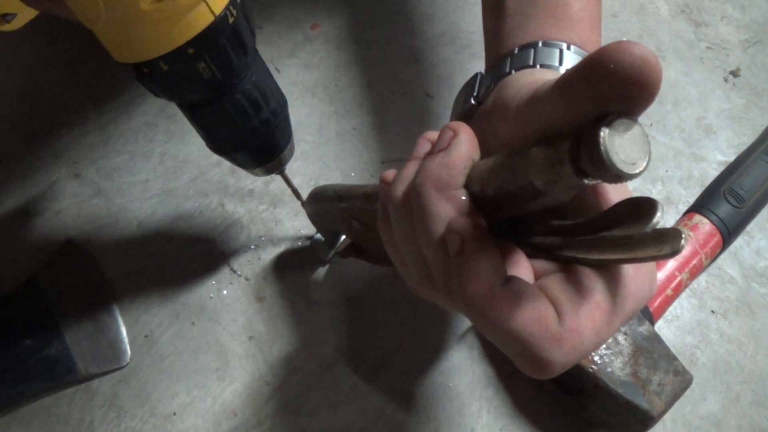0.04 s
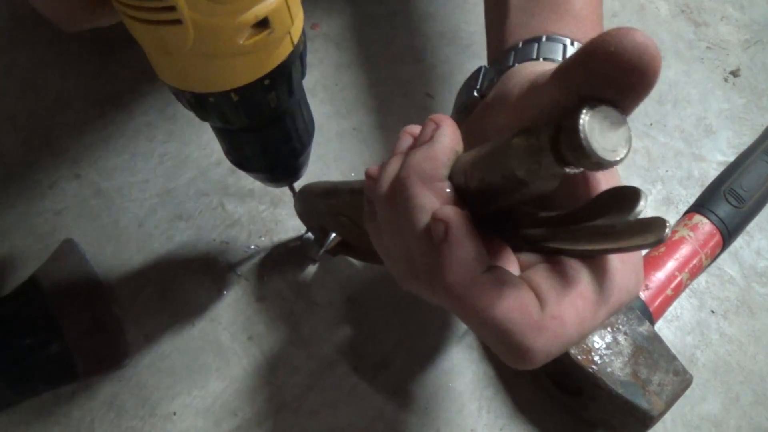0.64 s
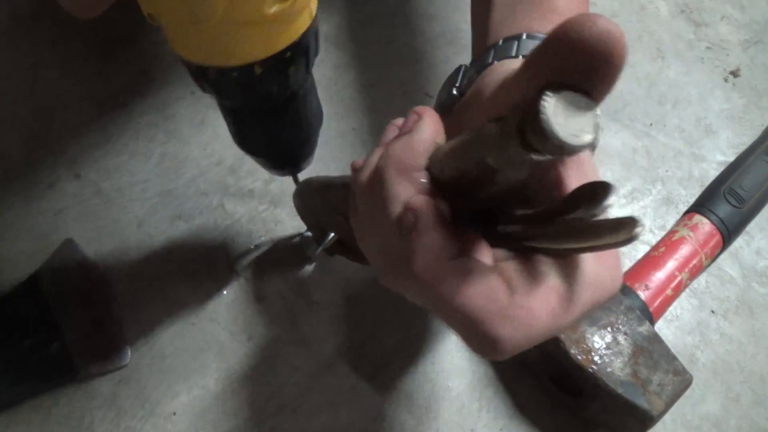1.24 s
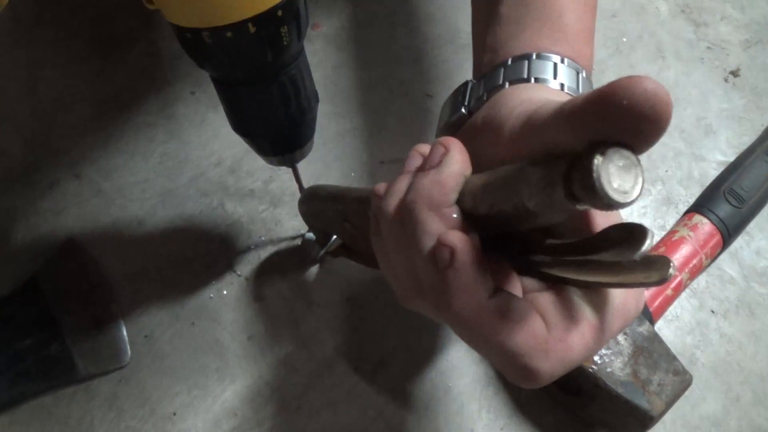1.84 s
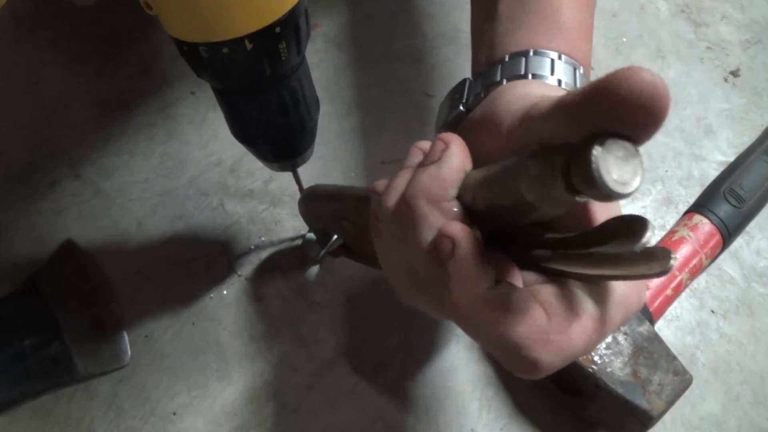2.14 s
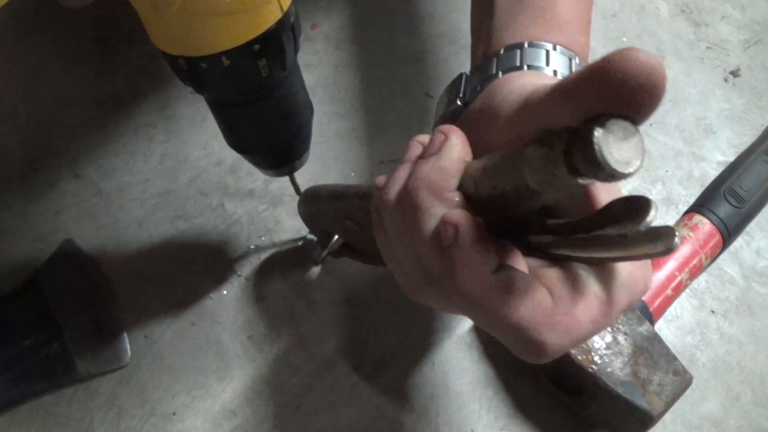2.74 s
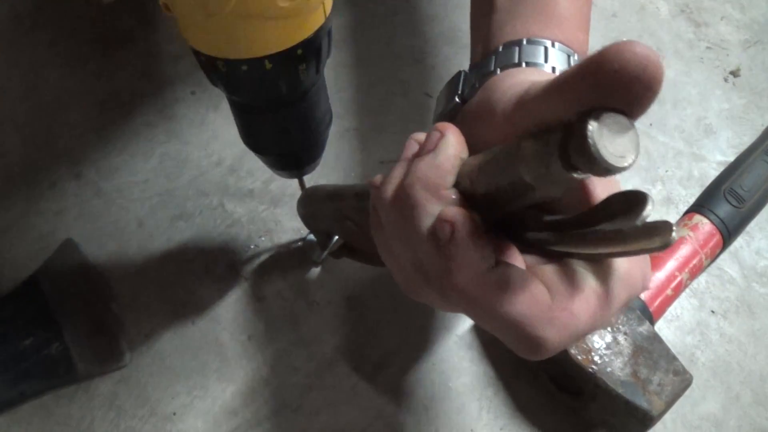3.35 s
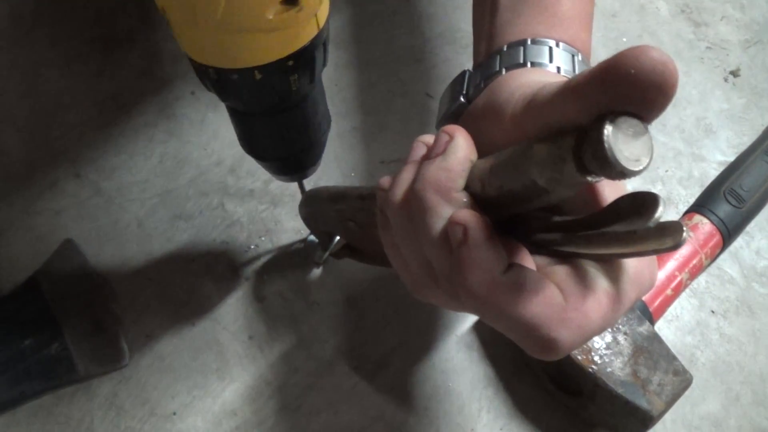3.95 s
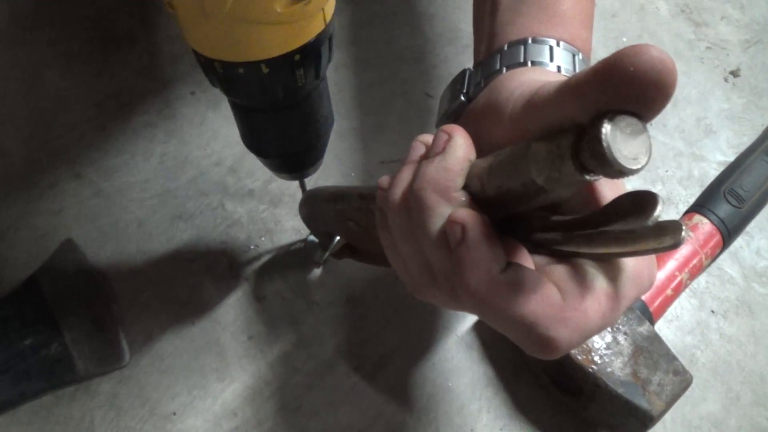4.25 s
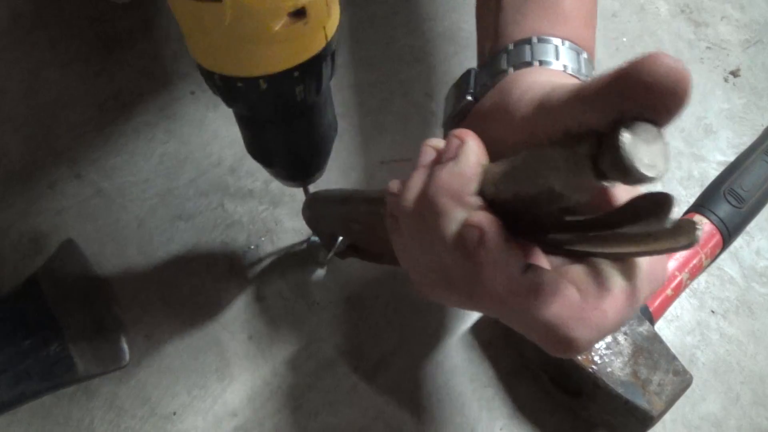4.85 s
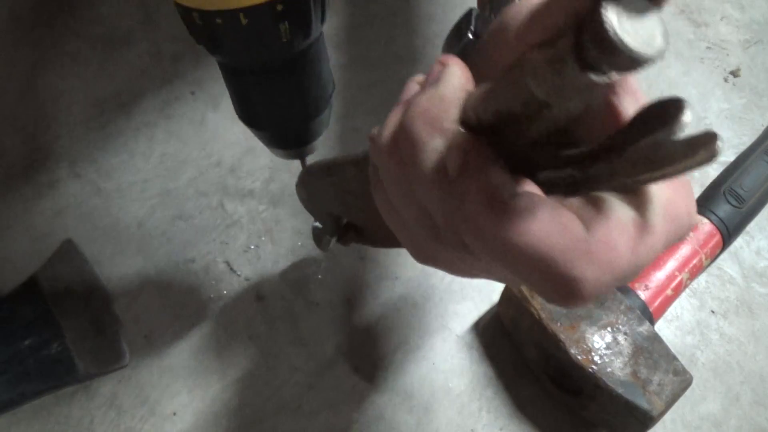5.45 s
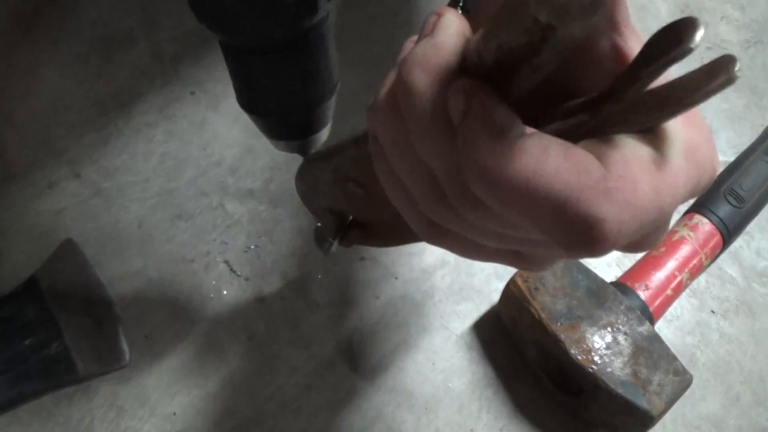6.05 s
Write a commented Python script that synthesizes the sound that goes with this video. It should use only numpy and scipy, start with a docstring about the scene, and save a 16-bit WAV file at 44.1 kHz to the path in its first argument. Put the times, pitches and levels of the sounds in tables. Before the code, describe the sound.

Close up in a quietly humming workshop, a cordless drill gives two quick, clacking blips. Its bit ticks and rubs faintly on steel, then catches with a shrill, ringing crack as the motor starts again. A run of eight more short bursts follows, each a rising motor whine with gear rattle and harsh, hissing metal grinding, some with a brief groan from the bit. The room adds a little reverberation.

```python
"""Cordless drill on steel

A drill is blipped eleven times against a small steel part held in locking pliers on a concrete floor.
Each pull takes up the gear slack, spins the motor up and brakes it: gears whine and rattle in the
housing while the bit grinds. The bit clicks, groans, squeaks and snags, and the steel rings.
The workshop hums and reverberates; a limiter flattens the loud bursts."""
import sys
import numpy as np
from scipy import signal
from scipy.fft import rfft, irfft, next_fast_len
from scipy.io import wavfile
from scipy.ndimage import uniform_filter1d

SR = 44100
rng = np.random.default_rng(int(sys.argv[2]) if len(sys.argv) > 2 else 0)


def to_wav(sig):
    """Store sig (one row per channel, or 1-D mono) as 16-bit WAV at the path in sys.argv[1].

    Samples outside -1..1 are clipped; the rate is SR.
    """
    pcm = np.clip(np.atleast_2d(sig), -1, 1) * 32767
    pcm = np.round(pcm).astype(np.int16)
    wavfile.write(sys.argv[1], SR, pcm.T)  # frames by channels


N = 268304
TIME = np.arange(N) / SR

# trigger pulls: (power on [s], at rest [s], target speed [Hz], spin-up time constant [s],
# slack clack [dB], grinding [dB], screech [dB])
PULLS = [(.897, 1.02, 419.7, .013, -30, -13, -15), (1.214, 1.319, 398.7, .008, -10.5, -15, -17),
         (2.223, 2.387, 381, 0.024, -21, -22, -11.5), (2.663, 2.833, 402.7, 0.038, -18, -1, -2),
         (3.266, 3.444, 414, 0.033, -14.5, -1, -1.5), (3.589, 3.779, 401.5, .048, -18.5, 1, 1.5),
         (3.905, 4.131, 491, 0.068, -29, 2, 1), (4.253, 4.477, 424.5, .063, -30, 0.5, -3.5),
         (4.707, 4.928, 416.6, 0.059, -28.5, 1.5, -11), (5.428, 5.616, 339.7, 0.043, -22, 2, 4),
         (5.866, 6.089, 339.5, 0.043, -27.5, -0.5, 2.5)]
# housing response: (frequency [Hz], level [dB])
HOUSING = [(100, -50), (300, -9), (600, -13), (950, -4), (1200, -2.5), (1700, -5), (2600, -5), (3200, -15),
           (4000, -4), (5000, -2), (6400, -11.5), (9000, -9), (13000, -22), (16000, -33)]
# housing modes: (frequency [Hz], width [Hz], level [dB])
HOUSING_MODES = [(1180, 610, -4), (1604, 89, -6), (2213, 164, -4), (2616, 114, -2.5), (3990, 183, 7),
                 (4920, 320, 9.5)]
# bit-on-steel friction spectrum: (frequency [Hz], level [dB])
GRIND = [(300, -32.5), (1000, -26), (2200, -17), (3300, -12.5), (4100, -15), (4650, 0.5), (5500, -3.5),
         (6500, -8.5), (7200, -4), (7700, 0.5), (8400, -4.5), (9400, -0.5), (11500, -7.5), (16000, -26.5)]


def gain_of(db):
    """Decibels to amplitude."""
    return 10 ** (np.asarray(db) / 20)


def unit_rms(x):
    """Scales to rms 1."""
    return x / np.sqrt(np.mean(x ** 2) + 1e-20)


def log_interp(points, hz):
    """Interpolates (frequency [Hz], value) points on a log-frequency axis."""
    points_hz, values = np.transpose(points)
    return np.interp(np.log(hz + 1), np.log(points_hz + 1), values)


def add(mix, at_s, sound):
    """Mixes a sound in at a time."""
    part = mix[round(at_s * SR):][:len(sound)]
    part += sound[:len(part)]


def wander(count, cutoff_hz):
    """Low-passed noise of rms 1."""
    size = next_fast_len(count, True)
    rolloff = 1 + (np.fft.rfftfreq(size, 1 / SR) / cutoff_hz) ** 4
    return unit_rms(irfft(rfft(rng.standard_normal(size)) / rolloff, size)[:count])


def convolve(x, response):
    """Applies an impulse response scaled to unit energy."""
    return signal.oaconvolve(x, response / np.linalg.norm(response))[:len(x)]


def colour(x, spectrum):
    """Causal unit-energy filter shaped by (frequency [Hz], level [dB]) points."""
    log_gain = np.log(gain_of(log_interp(spectrum, abs(np.fft.fftfreq(8192, 1 / SR)))))
    taps = np.fft.ifft(np.exp(np.conj(signal.hilbert(log_gain)))).real
    return convolve(x, taps)


def damped_ring(force, modes):
    """A force drives short-lived modes: (frequency [Hz], width [Hz], level [dB])."""
    t = TIME[:SR // 20]
    ring = sum((-1) ** k * gain_of(db) * np.exp(-np.pi * width_hz * t) * np.sin(2 * np.pi * hz * t)
               for k, (hz, width_hz, db) in enumerate(modes))
    return convolve(force, ring)


def burst(decay_s):
    """Contact noise: fast rise, exponential decay."""
    t = TIME[:SR // 8]
    return rng.standard_normal(len(t)) * np.exp(-t / decay_s) * (1 - np.exp(-t / 0.00016))


def contacts(rows, decay_s):
    """Force of brief contacts: (time [s], level [dB])."""
    force = np.zeros(N)
    for at_s, db in rows:
        add(force, at_s, gain_of(db) * burst(decay_s))
    return force


def workshop_noise():
    """Low stereo room noise with a wavering hum."""
    spectrum = [(20, -48), (33, -31), (48, -3.5), (85, -7.5), (140, -1), (200, -1), (260, -6), (420, -4),
                (700, -13), (950, -11.5), (1400, -19.5), (3500, -25.5), (8000, -31.5), (15000, -33.5)]  # room noise: (frequency [Hz], level [dB])
    hum_tones = [(109, -6), (195, -9.5), (216, -9.5)]  # hum: (frequency [Hz], level re room noise [dB])
    envelope = [(0.0, -46), (3.57, -45.5), (4.0, -50), (6.08, -51)]  # noise and hum together: (time [s], level [dB])
    hum = np.zeros(N)
    for hz, db in hum_tones:
        swell = gain_of(db) * (1 + .5 * wander(N, 1.6))
        hum += swell * np.sin(2 * np.pi * np.cumsum(hz + 2.47 * wander(N, 5.93)) / SR)
    mid = colour(rng.standard_normal(N), spectrum) + hum
    side = colour(rng.standard_normal(N),
                  [(30, -31), (300, -5), (700, -0.5), (2000, -6.5), (8000, -19), (16000, -42)])
    level = gain_of(np.interp(TIME, *np.transpose(envelope)))
    return level * (gain_of(0.1) * mid + gain_of(-14.5) * np.array([side, -side]))


def bit_clicks():
    """Light, dry touches of the bit against its hole."""
    touches = [(.166, -42), (.332, -29.5), (1.179, -32), (1.346, -28), (1.394, -38), (1.999, -27),
               (2.227, -10.5), (5.246, -33)]  # bit contacts: (time [s], level [dB])
    force = contacts(touches, decay_s=0.0037)
    crack = colour(force, [(500, -11), (3500, -19), (5000, -5), (6500, 2), (9500, -8),
                           (12500, -4.5), (16000, -21)])
    ring = damped_ring(force, [(4500, 130, -8), (7640, 120, 2), (9900, 270, -5.5)])
    return gain_of(-1.5) * crack + gain_of(-3) * ring


def hand_ticks():
    """Dull ticks: the grip shifts, and the trigger moves just before each power-on."""
    grip = [(.287, -37), (2.113, -35), (2.124, -30)]  # grip shifts: (time [s], level [dB])
    lead_s, trigger_db = 0.016, -39
    trigger = [(on_s - lead_s, trigger_db) for on_s, *_ in PULLS]
    force = contacts(grip + trigger, decay_s=0.0046)
    return colour(force, [(200, -14), (1500, 4.5), (3500, -6), (5000, -3), (10000, -10.5), (16000, -24)])


def clacks():
    """Knocks as the pulls start and stop, short bursts as two pulls brake, and the closing gear slack strike
    the housing and ring the steel chuck."""
    knocks = [(.883, -17), (.889, -14.5), (.964, -11.5), (1.284, -13.5), (2.824, -19), (4.925, -21),
              (5.592, -17), (6.071, -16)]  # further knocks as pulls start and stop, and two short bursts ringing the housing as pulls brake: (time [s], level [dB])
    force = contacts(knocks, decay_s=0.0041)
    seating = 1 - np.exp(-TIME[:SR // 8] / 0.0016)  # teeth seat gradually
    for on_s, _, _, spin_s, clack_db, *_ in PULLS:
        add(force, on_s, gain_of(clack_db) * seating * burst(decay_s=0.48 * spin_s))
    shell = damped_ring(force, HOUSING_MODES)
    chuck = damped_ring(force, [(4100, 200, 0), (4900, 140, 0.84)])
    return gain_of(-1) * shell + gain_of(-11) * chuck + gain_of(-5) * colour(force, HOUSING)


def pull_forces(start_s, rest_s, target_hz, spin_s, grind_db, screech_db):
    """One spin-up and braking: whine, mesh, rattle, chip and screech forces follow the motor speed."""
    orders = [(1, -18), (2, -6.5), (3, -6), (4, -7.5), (5, -9), (6, 4), (9, -6.5), (12, 3.5)]  # motor whine: (multiple of motor speed, level [dB])
    brake_s, gear_teeth = .052, 16
    catches_per_s, catch_decay_s, catch_db = 14, 0.0018, 7
    gentleness = np.log2(spin_s / .04)  # doublings of spin-up time: more whine, less tooth load
    t = np.arange(start_s, rest_s, 1 / SR)
    count = len(t)
    torque = np.exp(-(t - start_s) / spin_s)
    coast = np.clip((rest_s - t) / brake_s, 0, 1)  # 1 under power, 0 at rest
    motor_hz = target_hz * (1 - torque) * coast * (1 + .009 * wander(count, 150))
    turns = np.cumsum(motor_hz) / SR
    speed = np.maximum(motor_hz, 0) / 400
    whine = np.zeros(count)
    for order, db in orders:
        level = gain_of(db + 3 * gentleness) * (1 + 0.5 * wander(count, 86))
        whine += level * np.sin(2 * np.pi * (order * turns + rng.random()))
    # play between the teeth smears the gear tone
    flutter = gain_of(2 * wander(count, 200))
    mesh = flutter * np.sin(2 * np.pi * (gear_teeth * turns + .15 * wander(count, 350)))
    tooth_load = 0.056 + (torque + .5 * coast * (1 - coast)) * gain_of(-3.5 * gentleness)
    # loose gears knock once a turn, hardest in spin-up and braking, and jolt when the bit catches
    knock = unit_rms(0.85 + np.exp(-(turns % 1) / 0.43)) * gain_of(1.85 * wander(count, 106))
    strain = (1 + 2 * torque + 2.4 * (1 - coast)) * np.sqrt(coast)
    catches = rng.random(count) < catches_per_s / SR
    jolts = signal.lfilter([gain_of(catch_db)], [1, -np.exp(-1 / (catch_decay_s * SR))], catches)
    rattle = knock * (strain + jolts) * gain_of(2.3 * wander(count, 600)) * rng.standard_normal(count)
    # chips break off in clumps; the edge grabs and screeches in fits
    chips = knock * gain_of(grind_db + 1.6 * wander(count, 850)) * rng.standard_normal(count)
    screech = knock * gain_of(screech_db + 3 * wander(count, 70)) * rng.standard_normal(count)
    forces = [whine * speed ** 0.98, mesh * speed ** 0.7 * tooth_load, rattle * speed ** 0.5,
              chips * speed ** 1.64, screech * speed ** 1.5]
    return gain_of(-gentleness) * np.array(forces)


def drill():
    """Motor and gears sound through the housing; the cutting edge hisses and sets the bit screeching."""
    bit_modes = [(4425, 195, -2), (4760, 280, 0), (5110, 220, -3.5), (5690, 280, -4), (7600, 170, -13.5),
                 (9300, 500, -6)]  # bit resonances: (frequency [Hz], width [Hz], level [dB])
    tracks = np.zeros((5, N))
    for on_s, rest_s, target_hz, spin_s, _, grind_db, screech_db in PULLS:
        slack_s = min(.011, .42 * spin_s)
        start_s = on_s + slack_s
        forces = pull_forces(start_s, rest_s, target_hz, spin_s, grind_db, screech_db)
        for track, force in zip(tracks, forces):
            add(track, start_s, force)
    whine, mesh, rattle, chips, screech = tracks
    gears = colour(gain_of(-36.5) * whine + gain_of(-27) * rattle, HOUSING)
    shell = damped_ring(gain_of(-18.5) * mesh + gain_of(-34.5) * rattle, HOUSING_MODES)
    cutting = gain_of(-10.5) * colour(chips, GRIND) + gain_of(-16) * damped_ring(screech, bit_modes)
    return gears + shell + cutting


def bit_groans():
    """The bit judders against the wall of its hole: short, rough, gliding tones."""
    # judders: (start [s], end [s], first pitch [Hz], last pitch [Hz], level [dB])
    judders = [(0.927, 0.992, 297, 328, -36), (3.616, 3.701, 402, 688, -26.5),
               (5.531, 5.596, 896, 871, -31.5), (5.96, 6.017, 822, 870, -33)]
    out = np.zeros(N)
    for start_s, end_s, first_hz, last_hz, db in judders:
        count = len(np.arange(start_s, end_s, 1 / SR))
        glide_hz = first_hz + (last_hz - first_hz) * np.sin(np.linspace(0, np.pi / 2, count))
        phase = 2 * np.pi * np.cumsum(glide_hz * (1 + 0.026 * wander(count, 220))) / SR
        swell = signal.windows.tukey(count, .5) * gain_of(db + 3.3 * wander(count, 95))
        add(out, start_s, swell * (np.sin(phase) + gain_of(-5) * np.sin(2 * phase)))
    return out


def bit_squeaks():
    """Stick-slip: a thin whistle that arches in pitch, flat and ragged as the bit catches and lets go."""
    # slips: (start [s], end [s], top pitch [Hz], level [dB], roughness at the top [0-1])
    slips = [(1.188, 1.213, 7850, -35, 0.75), (2.003, 2.088, 9620, -34, .01)]
    pitch_sag, rough_ends = .14, .8
    out = np.zeros(N)
    for start_s, end_s, top_hz, db, rough_top in slips:
        count = round((end_s - start_s) * SR)
        off_top = (1 - np.sin(np.pi * np.linspace(0, 1, count) ** 1.2)) ** 2
        roughness = rough_top + (rough_ends - rough_top) * off_top
        hz = top_hz * (1 - pitch_sag * off_top) * (1 + 0.1 * roughness * wander(count, 950))
        whistle = np.sqrt(2) * np.sin(2 * np.pi * np.cumsum(hz) / SR)
        add(out, start_s, gain_of(db) * signal.windows.tukey(count, .1) * whistle)
    return out


def steel_ring(force):
    """A force drives the long modes of the steel part and the pliers."""
    modes = [(1995, -5, 0.29), (4575, -16.5, 1.2), (5250, -6, .25), (5530, -23, 1.5), (5870, -11, 0.95),
             (7640, -4, .25), (7700, -19, 1.23), (8760, -12, .6), (9340, -6.5, .28), (10360, -9, .24),
             (11560, -4, 0.18), (12110, 5, .18)]  # clamped steel: (frequency [Hz], level [dB], T60 [s])
    t = TIME[:SR]
    ring = sum(gain_of(db - 60 * t / t60_s) * np.sin(2 * np.pi * hz * t) for hz, db, t60_s in modes)
    return convolve(force, ring)


def bit_rub():
    """The resting bit slides on the steel and rings it: one faint stroke that swells, holds and fades."""
    start_s, end_s = 1.3, 1.95
    count = round((end_s - start_s) * SR)
    force = np.zeros(N)
    add(force, start_s, gain_of(-55) * signal.windows.tukey(count, .55) * rng.standard_normal(count))
    hiss = colour(force, GRIND)
    return gain_of(0.5) * hiss + gain_of(-14) * steel_ring(hiss)


def bit_snags():
    """The spinning bit snags and strikes the steel: shrill crack, dense bright wash, long modes."""
    strikes = [(2.2935, 4.5), (2.310, -6), (2.681, -29), (4.787, -9.5)]  # steel-on-steel blows: (time [s], level [dB])
    wash_spectrum = [(1000, -40), (3600, -29), (4700, -9), (6000, -2.5), (6800, -10), (7700, -6.5),
                     (8600, -7), (10400, -1), (11200, 0), (12200, -2), (13200, -20), (16000, -28)]  # dense ring of the steel: (frequency [Hz], level [dB])
    wash_t60_s = 0.29
    t = TIME[:SR // 2]
    cracks = contacts(strikes, decay_s=0.0035)
    impulses, wash = np.zeros((2, N))
    for at_s, db in strikes:
        add(impulses, at_s, gain_of([db]))
        add(wash, at_s, gain_of(db - 60 * t / wash_t60_s) * rng.standard_normal(len(t)))
    shrill = damped_ring(cracks, [(11800, 760, 3), (5900, 270, -17)])
    bright = colour(gain_of(6) * cracks + gain_of(-8) * wash, wash_spectrum)
    return gain_of(7) * shrill + bright + gain_of(13) * steel_ring(impulses)


def room(x):
    """Sparse reflections of random sign, each band decaying at its own rate."""
    decay = [(150, 0.88), (1000, 0.45), (4000, 0.46), (9000, 0.34), (15000, 0.18)]  # workshop reverberation: (frequency [Hz], T60 [s])
    reflections_per_s, predelay_s = 4000, .004
    taps = rng.standard_normal(SR) * (rng.random(SR) < reflections_per_s / SR) * (TIME[:SR] > predelay_s)
    hz, frame_s, bands = signal.stft(taps, SR, nperseg=256)
    fade = gain_of(-60 * frame_s / log_interp(decay, hz)[:, None])
    tail = signal.istft(bands * fade, SR, nperseg=256)[1]
    return convolve(x, tail)


def scene():
    """Drill and steel, close and just left of centre, in a nearly mono room over the workshop noise."""
    near = (drill() + bit_groans() + clacks() + bit_snags() + bit_clicks() + hand_ticks()
            + bit_squeaks() + bit_rub())
    # walls absorb treble
    returned = colour(near, [(100, -0.5), (2500, -0.5), (5000, -8), (9000, -3.5), (16000, -3)])
    mid = near + gain_of(-18.5) * room(returned)
    # floor and hand reflect differently to left and right
    bounce_s = .0005
    delayed = np.interp(TIME - bounce_s, TIME, near)
    bounce = colour(delayed, [(100, -25), (500, 8.5), (2200, 3), (4500, 2), (9000, 5.5), (14000, -1)])
    side = gain_of(-27.5) * room(returned) + gain_of(-23) * bounce
    return np.array([gain_of(0.46) * (mid + side), gain_of(-0.02) * (mid - side)]) + workshop_noise()


def limit(x, ceiling_db, recovery_db_per_s):
    """Stereo-linked rms limiter: fast attack, release linear in dB."""
    power_db = 10 * np.log10(abs(uniform_filter1d((x ** 2).mean(0), size=90)) + 1e-12)
    fall_db = TIME * recovery_db_per_s
    held_db = np.maximum.accumulate(power_db + fall_db) - fall_db
    over_db = np.maximum(held_db - ceiling_db, 0)
    return x / gain_of(uniform_filter1d(over_db, size=40))


def record(dry):
    """Limiter, soft clip of the peaks that slip past it, then a steep low-pass."""
    clip_level, cutoff_hz = .56, 15900
    limited = limit(dry, ceiling_db=-14.5, recovery_db_per_s=275)
    clipped = limited / (1 + (limited / clip_level) ** 6) ** (1 / 6)
    lowpass = signal.firwin(511, cutoff_hz, window=("kaiser", 9), fs=SR)
    return signal.oaconvolve(clipped, lowpass[None], "same")


dry = scene()
out = record(dry)
to_wav(out)
```